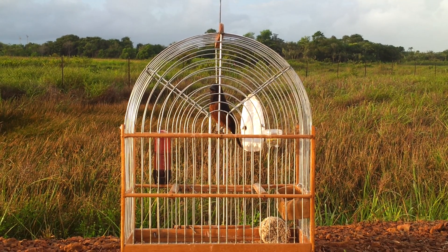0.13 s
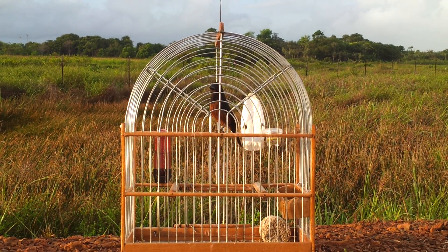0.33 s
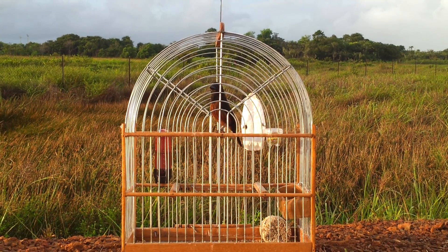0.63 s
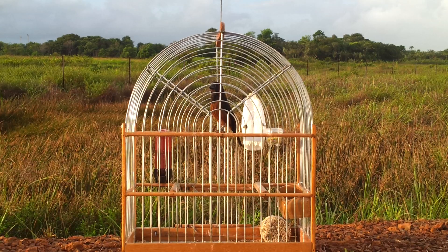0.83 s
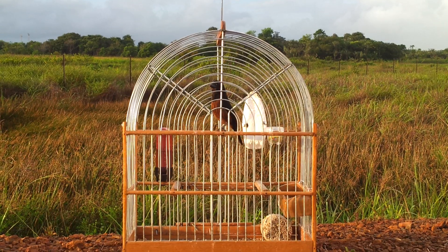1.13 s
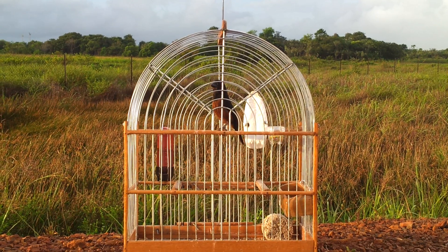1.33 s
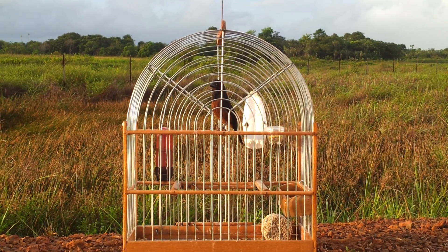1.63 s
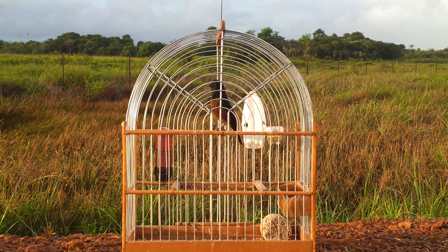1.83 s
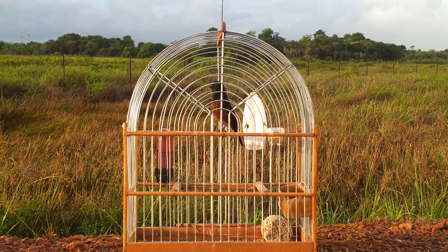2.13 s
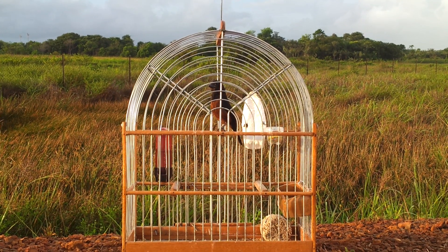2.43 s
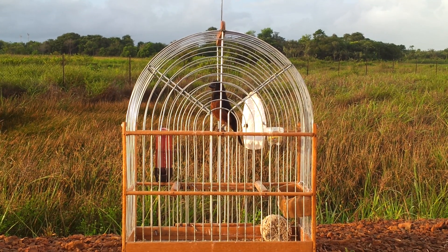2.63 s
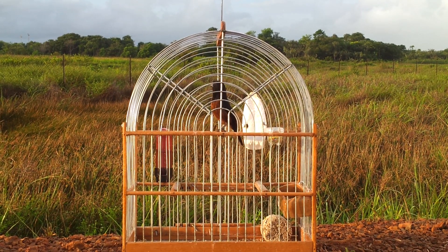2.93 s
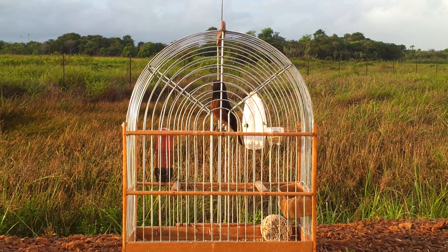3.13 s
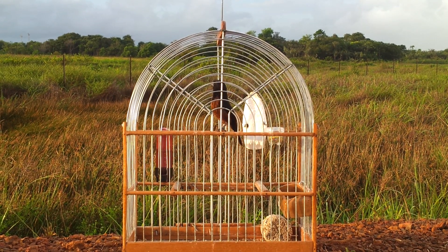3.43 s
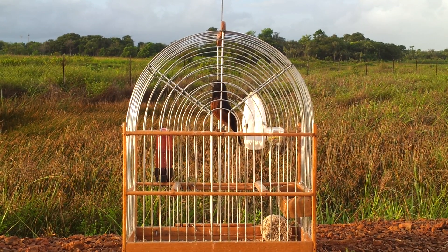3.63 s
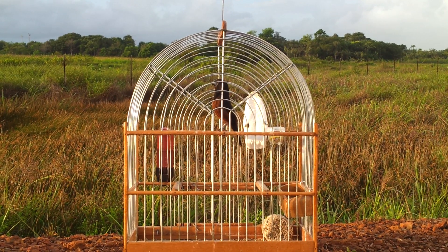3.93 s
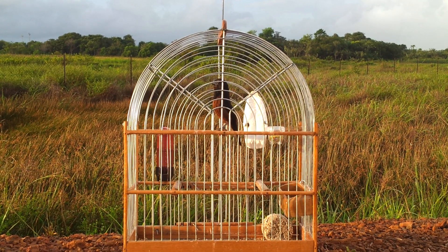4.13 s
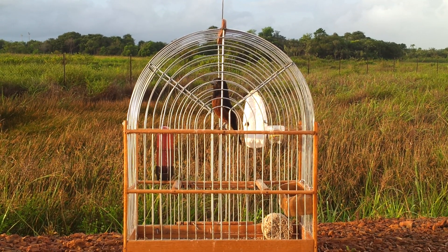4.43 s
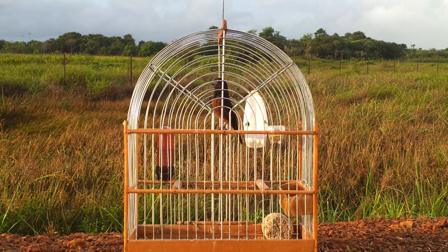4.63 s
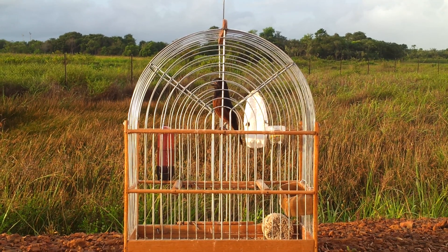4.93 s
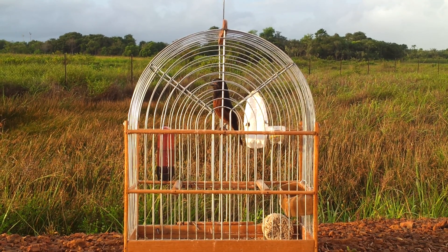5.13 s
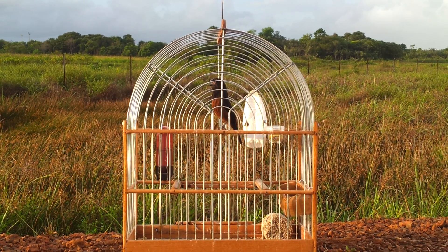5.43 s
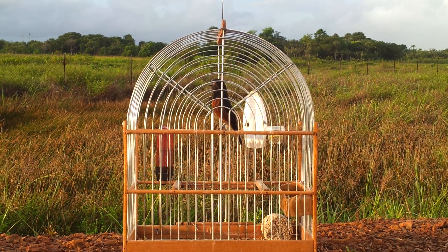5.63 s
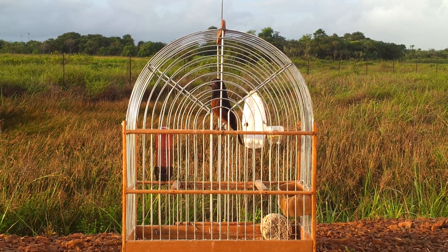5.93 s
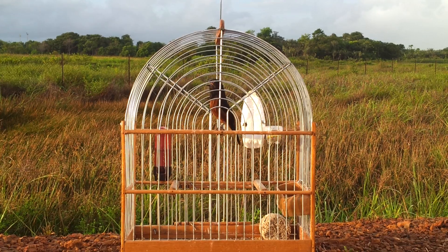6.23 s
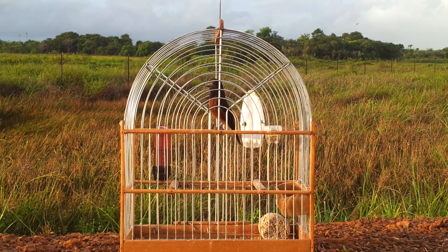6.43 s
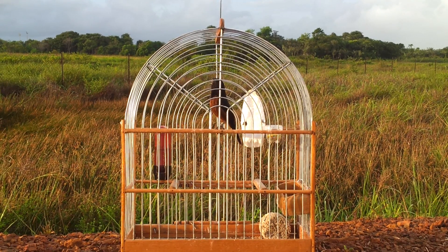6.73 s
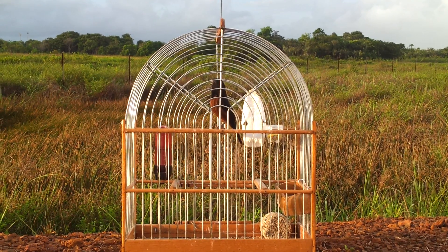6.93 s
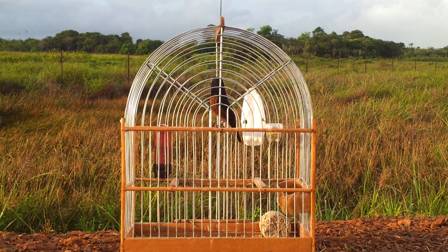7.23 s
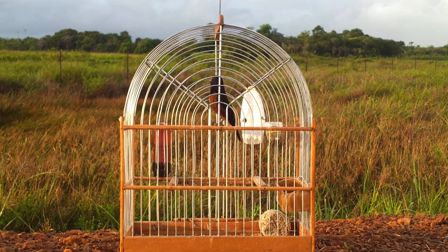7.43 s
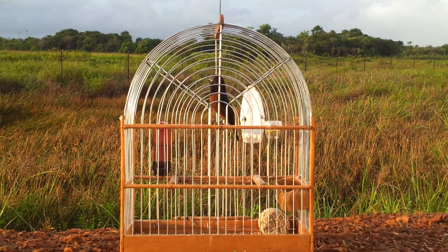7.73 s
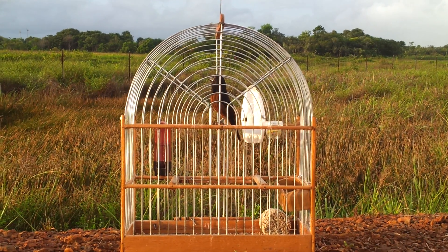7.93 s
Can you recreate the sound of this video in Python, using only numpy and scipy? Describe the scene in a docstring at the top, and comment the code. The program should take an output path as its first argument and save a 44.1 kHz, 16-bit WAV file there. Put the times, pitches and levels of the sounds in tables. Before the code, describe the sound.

Close by, a caged finch sings one long phrase in an open field. Before it starts there are only faint distant chirps, a high insect drone and a low hush of air. The song opens with soft gliding whistles, then speeds up and swells through reedy notes and quick buzzy trills, finishing on a short hooked whistle. The insects and air carry on underneath throughout.

```python
"""A steady insect chorus and the low wash of open air fill a grass field; faint far birds call first.
From 2.9 s a caged seed finch sings one accelerating, swelling phrase, its syrinx gliding through
pure slurs, then reedy notes too. From 5.7 to 6.9 s come three buzzy trills of overlapping sweeps,
the second opened by a nasal squeak. Slurs and a last hook end the phrase at 8.2 s.
Reflections off the cage tray and the ground make every glide flutter in level."""
import sys
import numpy as np
from scipy import signal
from scipy.fft import rfft, irfft, next_fast_len
from scipy.io import wavfile
from scipy.ndimage import uniform_filter1d, minimum_filter1d, map_coordinates

SR = 44100
rng = np.random.default_rng(int(sys.argv[2]) if len(sys.argv) > 2 else 0)


def int16_out(signal):
    """Quantize to a 16-bit WAV file."""
    q = np.round(np.clip(np.atleast_2d(signal).T, -1, 1) * 32767)
    wavfile.write(sys.argv[1], SR, q.astype(np.int16))


N = 356769

# Pure syllable shapes: t/s from onset, f/Hz, level/dB
DIP = [(0, 4320, -12.5), (.015, 4070, -11), (.048, 4000, -9.5), (.085, 3277, -18), (.121, 3386, -2.5),
       (.161, 3790, -0.5), (.173, 3257, -18.5), (.219, 3160, -17)]  # dips, climbs back
HOOK = [(0, 3850, -17.5), (.052, 3693, -1), (.082, 3310, -19.5), (.102, 3784, -10), (.136, 3660, -3.5),
        (.222, 3149, -6), (.234, 4140, -13), (.245, 4270, -34)]  # two falls, upward hook
STAIR = [(0, 3965, -18.5), (.018, 4080, -3), (.029, 4300, -7), (.068, 2960, -24), (.103, 3120, -4.5),
         (.153, 3143, -1), (.178, 2560, -23)]  # high step, held low step
PEAK = [(0, 4410, -18.5), (.018, 4634, -13), (.04, 5340, -22.5), (.046, 6430, -41.5), (.06, 4900, -12.5),
        (.071, 4476, -3.5), (.103, 3804, -3), (.122, 3643, -19)]  # thin peak, loud fall
# Pure syllables: shape, t/s, time stretch, pitch ratio, level/dB, crescendo/dB
PURE_SYLLABLES = [(DIP, 2.922, 0.97, 1.025, -38.5, 2.4), (DIP, 3.233, 0.97, 0.99, -30.5, -1),
                  (HOOK, 4.38, 1., 1., -15, 0), (STAIR, 4.697, 0.98, 1., -13, 1.5),
                  (STAIR, 5.02, 0.99, 0.999, -11, 0), (PEAK, 6.426, 0.98, 1., -3.5, 0),
                  (PEAK, 6.583, 0.88, 1.005, -5, 4), (HOOK, 7.99, .92, 0.99, -14.5, 2.5)]
# Slurs, one contour each: t/s, f/Hz, level/dB
SLURS = [
    [(3.539, 4020, -42.5), (3.601, 3666, -23), (3.651, 3050, -42.5), (3.667, 3730, -35.5),
     (3.687, 3857, -29), (3.699, 3854, -42), (3.711, 3790, -25), (3.747, 3140, -36), (3.752, 3110, -41)],
    [(4.016, 3820, -32.5), (4.052, 3730, -22.5), (4.09, 3574, -26.5), (4.124, 3230, -22),
     (4.162, 2760, -37.5), (4.21, 3285, -25), (4.248, 3273, -19.5), (4.282, 3140, -25.5),
     (4.298, 3270, -40)],
    [(6.972, 3850, -33), (6.992, 3737, -14.5), (7.024, 3657, -31.5), (7.036, 3150, -41.5),
     (7.072, 3080, -17), (7.08, 3124, -28), (7.108, 3454, -13), (7.128, 3666, -13), (7.136, 3800, -33)],
    [(7.189, 3700, -39), (7.199, 3635, -17), (7.223, 3581, -13), (7.243, 3347, -12), (7.267, 3140, -27.5),
     (7.285, 3028, -10.5), (7.315, 2694, -24), (7.327, 2560, -30), (7.335, 2590, -50)],
    [(7.585, 3630, -33.5), (7.627, 3760, -15.5), (7.697, 3165, -12.5), (7.721, 2754, -22.5),
     (7.743, 2646, -35.5), (7.773, 3260, -18), (7.797, 3229, -17), (7.853, 2844, -21), (7.868, 2450, -41)],
]
# Harmonics 1, 2, ...: level/dB
PURE_HARMONICS_DB = [1.5, -34, -38]


def whistles():
    """Near-sine syllables and slurs from the syrinx."""
    contours = syllable_contours(PURE_SYLLABLES) + list(SLURS)
    return syrinx(contours, PURE_HARMONICS_DB, jitter=.0025, roughness=.008, effort=.1)


# Reedy syllable shapes: t/s from onset, f/Hz, level/dB
SCOOP = [(0, 2186, -16), (.016, 1876, -3), (.038, 1680, -10.5), (.062, 2070, -3.5), (.1, 2110, -0.5),
         (.11, 1866, -5), (.119, 1300, -16)]  # scoops up, holds
SHELF = [(0, 3050, -34.5), (.033, 2257, -2.5), (.054, 2271, -2), (.073, 2365, -1.5), (.092, 1723, -13)]  # slides down, holds, drops
CROAK = [(0, 1410, -12), (.007, 1906, 1), (.018, 1870, 1.5), (.029, 1500, -16.5)]
ARCH = [(0, 1219, -19.5), (.023, 1540, -8), (.055, 1674, -15), (.106, 1928, -4), (.152, 2152, -4),
        (.189, 2417, -1.5), (.218, 2076, -2.5), (.254, 1847, -10), (.284, 1778, -13), (.301, 1450, -16)]
# Reedy syllables: shape, t/s, time stretch, pitch ratio, level/dB, crescendo/dB
REEDY_SYLLABLES = [(SCOOP, 3.851, 1, 1.008, -26.5, 1), (SHELF, 4.86, 0.97, .99, -15.5, 0),
                   (SHELF, 5.185, 1., 1.008, -12.5, 2), (CROAK, 5.343, 1., 1.014, -20, 0),
                   (ARCH, 5.372, 1., 1., -14.5, 0), (CROAK, 6.375, 1., 1.02, -25, -4),
                   (SCOOP, 7.42, 0.98, 1.008, -17, 0)]
# Harmonics 1, 2, ...: level/dB
REEDY_HARMONICS_DB = [-18, 0, -29, -30, -34]


def reedy_notes():
    """Low syllables carried by their second harmonic."""
    contours = syllable_contours(REEDY_SYLLABLES)
    return syrinx(contours, REEDY_HARMONICS_DB, jitter=.004, roughness=.02, effort=.55)


# Squeak contour: t/s, f/Hz, level/dB
SQUEAK = [(6.010, 1150, -43.5), (6.024, 1525, -27), (6.039, 1270, -38.5), (6.054, 1650, -40),
          (6.062, 1460, -36)]
# Harmonics 1, 2, ...: level/dB
SQUEAK_HARMONICS_DB = [-18.5, -15, 1, -2.5, -8.5]


def squeak():
    """A rough nasal note opens the falling trill."""
    return syrinx([SQUEAK], SQUEAK_HARMONICS_DB, jitter=.014, roughness=.28, effort=.14)


def syllable_contours(syllables):
    """Shapes placed, stretched, transposed and ramped in level."""
    contours = []
    for shape, start_s, stretch, ratio, db, crescendo_db in syllables:
        t, hz, shape_db = np.transpose(shape)
        ramp_db = crescendo_db * (t / t[-1] - .5)
        contours.append(np.c_[start_s + stretch * t, ratio * hz, db + shape_db + ramp_db])
    return contours


def syrinx(contours, harmonics_db, jitter, roughness, effort, edge_s=.00052, neutral_db=-18.5):
    """One side of the syrinx follows each contour; louder notes lean to their upper harmonics."""
    out = np.zeros(N)
    carrier = np.argmax(harmonics_db)
    for contour in contours:
        knots_s, knots_hz, knots_db = np.transpose(contour)
        t = np.arange(knots_s[0], knots_s[-1], 1 / SR)
        pitch_hz = glide(t, knots_s, knots_hz)
        level_db = np.interp(t, knots_s, knots_db)
        phase = jittered_phase(pitch_hz, jitter, drift_hz=277)
        tilt_db = effort * (level_db - neutral_db)
        tone = 0
        for k, db in enumerate(harmonics_db):
            colour = 1 if k == carrier else beak_gain((k + 1) * pitch_hz)
            tone += undb(db + tilt_db * np.sign(k - carrier)) * colour * np.sin((k + 1) * phase)
        gate = np.clip(np.minimum(t - t[0], t[-1] - t) / edge_s, 0, 1)
        flutter = 1 + roughness * drift(2600, len(t))
        add(out, t[0], gate * undb(level_db) * flutter * tone)
    return out


# Sweep trains, keyed as in sweep_train(). Pairs: first, last sweep; level/dB: first, climax, last
TRILLS = [ dict(start_s=5.742, count=7, period_s=(.018, .028), length_s=(0.023, .051), from_hz=(3390, 2740),
          to_hz=(4456, 3800), bow_hz=79.6, level_db=(-19.5, -6, -13.5), climax=.38, crest=0.66),
          dict(start_s=6.058, count=7, period_s=(.0158, .0162), length_s=(0.017, .022),
          from_hz=(4680, 4400), to_hz=(2830, 2560), bow_hz=-36, level_db=(-32.5, -22.5, -13.5),
          climax=0.52, crest=0.16), dict(start_s=6.065, count=7, period_s=(.0145, .018),
          length_s=(.015, 0.016), from_hz=(7780, 8100), to_hz=(5650, 5100),
          bow_hz=40.6, level_db=(-17, -10.5, -19), climax=.36, crest=0.44),
          dict(start_s=6.174, count=5, period_s=(.0225, 0.026), length_s=(.03, .031), from_hz=(4850, 4550),
          to_hz=(2730, 2560), bow_hz=30, level_db=(-5.5, -10, -17.5), climax=0.68, crest=0.32),
          dict(start_s=6.731, count=7, period_s=(.018, .0245), length_s=(.027, .046), from_hz=(3270, 2380),
          to_hz=(4245, 3560), bow_hz=172, level_db=(-16.5, -11.5, -19), climax=0.39, crest=0.74)]
# Lone slides, other side of the syrinx: t/s, length/s, start f/Hz, end f/Hz, bow/Hz, level/dB, crest/0-1
SLIDES = [(4.286, 0.0127, 3180, 3750, 0, -31, 0.35), (4.722, 0.05, 6210, 3560, -300, -26, 0.51),
          (5.045, 0.047, 6270, 3560, -300, -23, 0.63), (5.34, 0.013, 3300, 5000, 3, -23, .66),
          (5.738, 0.0055, 4750, 4640, -40, -26.5, .36), (5.918, 0.016, 3070, 2820, -100, -25.5, 0.43),
          (6.048, .013, 6270, 6550, 500, -16, .55), (6.399, 0.023, 2040, 2350, 1105, -22.5, 0.3),
          (6.888, 0.016, 2820, 2745, -56, -29.5, 0.6), (7.007, .021, 3740, 3490, 780, -26, .4),
          (7.701, 0.057, 3700, 4250, 6, -39, 0.7)]


def trills(coupling=.29, second_db=-28, third_db=-39, rasp_db=-35, high_rasp_db=-17,
           grit_db=-37, snap_grit_db=-27, low_cut_hz=2550):
    """Overlapping sweeps couple into sum and difference tones; high ones rasp, snaps are gritty."""
    snaps = sweeps(SLIDES, jitter=.009) + sweeps(closing_flicks(), jitter=.04)
    trains = [sweep for train in TRILLS for sweep in sweep_train(**train)]
    tone = snaps + sweeps(trains, jitter=.009)
    envelope = np.sqrt(uniform_filter1d(abs(tone) ** 2, size=180).clip(0) + 1e-12)
    phasor = tone / envelope
    voice = tone.real * (1 - coupling * (abs(phasor) ** 2 - 1))
    overtones = envelope * (undb(second_db) * phasor ** 2 + undb(third_db) * phasor ** 3).real
    overtones = irfft(rfft(overtones) * beak_gain(np.fft.rfftfreq(N, 1 / SR)), N)
    strain = uniform_filter1d(abs(highpass(tone, hz=5600)), size=500)
    rasp = stereo_noise(lambda hz: (hz / 3800) ** 3 / (1 + (hz / 4800) ** 5.1))[0]
    rasp *= undb(rasp_db) * envelope + undb(high_rasp_db) * strain
    grit = rng.standard_normal(N) * (undb(grit_db) * abs(tone) + undb(snap_grit_db) * abs(snaps))
    # Everything below the low cut is removed, so no low difference tones sound.
    return highpass(voice + overtones + grit + rasp, low_cut_hz)


def sweep_train(start_s, count, period_s, length_s, from_hz, to_hz, bow_hz, level_db, climax, crest):
    """Sweeps slow, lengthen and shift in pitch; the middle level falls at climax (0-1)."""
    starts_s = start_s + np.r_[0, np.cumsum(np.linspace(*period_s, count - 1))]
    spans = [np.linspace(*pair, count) for pair in (length_s, from_hz, to_hz)]
    levels_db = np.interp(np.linspace(0, 1, count), [0, climax, 1], level_db)
    return [(t, *span, bow_hz, db, crest) for t, *span, db in zip(starts_s, *spans, levels_db)]


def closing_flicks(lead_s=.014, length_s=.013, from_hz=6900, to_hz=3000, relative_db=-14, crest=.74):
    """Each reedy syllable snaps shut with a downward flick."""
    return [(note[-1, 0] - lead_s, length_s, from_hz, to_hz, 0, note[:, 2].max() + relative_db, crest)
            for note in syllable_contours(REEDY_SYLLABLES)]


def sweeps(rows, jitter):
    """Short bowed glides, each loudest at its crest (0-1), as one complex tone."""
    out = np.zeros(N, complex)
    for start_s, length_s, from_hz, to_hz, bow_hz, db, crest in rows:
        u = np.linspace(0, 1, int(length_s * SR))
        hz = from_hz + (to_hz - from_hz) * u + 4 * bow_hz * u * (1 - u)
        swell = np.sin(np.pi * np.interp(u, [0, crest, 1], [0, .5, 1])).clip(0) ** 1.5
        phase = jittered_phase(hz, jitter, drift_hz=1500)
        add(out, start_s, undb(db) * swell * np.exp(1j * phase))
    return out


# Throat and beak response: f/Hz, level/dB
BEAK_RESPONSE = [(2000, -3.5), (4000, 24.5), (5500, 6), (7000, 8.5), (8400, -6.5), (10000, 4.5), (11500, 9),
                 (14000, -1.5)]


def beak_gain(hz):
    """Throat and beak colour the harmonics."""
    return undb(np.interp(hz, *np.transpose(BEAK_RESPONSE)))


def throat_hiss(song, hiss_db=-35, centre_hz=4200, width_hz=800, knee=.1):
    """Air rushing through the syrinx rings the throat faintly during notes."""
    flow = np.tanh(uniform_filter1d(abs(song), size=200) / knee) * knee
    hiss = stereo_noise(lambda hz: (1 + ((hz - centre_hz) / width_hz) ** 2) ** -1.5)[0]
    return undb(hiss_db) * flow * hiss


# Tray and ground reflections, left list then right: delay/ms, signed gain
REFLECTIONS = [
    [(0.287, -0.31), (1.072, 0.06), (3.92, -0.56), (5.715, -0.33)],
    [(0.677, 0.071), (1.345, -0.44), (3.711, 0.13), (4.169, -0.32)],
]


def cage_and_field(song, left_db=.6, right_db=1.44, scatter_db=-32, t60_s=.37):
    """Direct song, near reflections and faint scatter from the grass."""
    left, right = (song + sum(gain * delayed(song, ms) for ms, gain in side) for side in REFLECTIONS)
    near = np.array([undb(left_db) * delayed(left, ms=.04), undb(right_db) * right])
    t = np.arange(int(.6 * SR)) / SR
    tail = rng.standard_normal((2, len(t))) * undb(-60 * t / t60_s)
    scatter = signal.fftconvolve(song[None], unit_rms(tail) / np.sqrt(len(t)), axes=1)[:, :N]
    return near + undb(scatter_db) * scatter


# Far chirps: t/s, length/s, start f/Hz, end f/Hz, bow/Hz, level/dB, crest/0-1
FAR_CHIRPS = [(.2, .04, 3700, 3380, 350, -58, .5), (.53, .04, 5400, 6600, 0, -57, .5),
              (.655, 0.05, 6000, 5400, 600, -53, .45), (.675, .03, 3700, 3350, 0, -57, .5),
              (.98, .035, 5100, 5130, 300, -56, .5), (1.26, .27, 5440, 5550, 1, -65, .4),
              (2.03, .22, 5500, 5500, 0, -64, .5), (2.415, .02, 5300, 4500, 0, -59, .5),
              (2.62, .07, 5600, 4800, 2, -56, .5)]
# Row of far pips, keyed as in sweep_train()
FAR_PIPS = dict(start_s=1.138, count=4, period_s=(.087, .116), length_s=(.023, .028), from_hz=(3680, 3750),
            to_hz=(3460, 3380), bow_hz=40, level_db=(-58, -56.5, -57.5), climax=.5, crest=.5)


def far_birds():
    """Faint chirps and pips from across the field."""
    return sweeps(FAR_CHIRPS + sweep_train(**FAR_PIPS), jitter=.022).real


# Choirs: f/Hz, width/Hz, level/dB, pulse rate/Hz, pulse depth/0-1, left minus right/dB
INSECT_CHOIRS = [(6415, 330, -57.5, 28.6, 0.7, 4), (6774, 180, -58, 34, 1, 5),
                 (7230, 820, -53, 52, 0, -1.5), (8160, 2100, -59, 69, 0.1, 2.5),
                 (9330, 1180, -59, 51, .2, -0.5), (5910, 1800, -62, 7.5, .3, 6.5)]


def insects(waver_db=.5):
    """Each choir rasps in its own band, pulsing with the wing strokes of its nearest members."""
    out = 0
    for centre_hz, width_hz, db, pulse_hz, depth, pan_db in INSECT_CHOIRS:
        band = stereo_noise(lambda hz: (1 + 2 * ((hz - centre_hz) / width_hz) ** 2) ** -2.)
        stroke = np.sin(jittered_phase(np.full(N, pulse_hz), jitter=.039, drift_hz=6.7))
        prominence = np.clip(.29 + .66 * drift(.83, N), 0, 1)
        pulsing = 1 + depth * stroke * prominence
        out += band * pulsing * undb(db + waver_db * drift(8.2, N)) * pan(pan_db)
    return out


# Open-air spectrum: f/Hz, relative level/dB
AIR_SPECTRUM = [(25, -26), (60, -18.5), (100, -9), (150, -2.5), (210, 0), (350, -1.5), (600, -3.5),
                (1000, -5), (1450, -9.5), (2400, -7), (3200, -11.5), (4500, -12.5), (10000, -15),
                (14500, -15.5)]


def air(level_db=-53, waver_db=-.04, pan_db=1.16, bass_hz=700, shared=.34, growth_db=4, growth_s=6.5):
    """Distant wash of the field; its bass, partly common to both sides, slowly grows."""
    knots_hz, knots_db = np.transpose(AIR_SPECTRUM)
    wash = stereo_noise(lambda hz: undb(np.interp(np.log(hz + 1), np.log(knots_hz), knots_db)))
    bass = signal.sosfilt(signal.butter(1, bass_hz, fs=SR, output="sos"), wash)
    crossfeed = shared * (bass[::-1] - bass) / 2
    growth = undb(growth_db * np.minimum(np.arange(N) / SR / growth_s, 1) ** 2)
    wash += crossfeed + bass * (growth - 1)
    return wash * undb(level_db + waver_db * drift(3.193, N)) * pan(pan_db)


def undb(db):
    """Decibels to gain."""
    return 10 ** (np.asarray(db) / 20)


def pan(db):
    """Left and right gains, db apart."""
    return undb([[db / 2], [-db / 2]])


def unit_rms(x):
    """Scale to rms 1."""
    return x / np.sqrt(np.mean(x ** 2))


def drift(rate_hz, size):
    """Smooth random curve, spread near 1."""
    at = np.arange(size) * rate_hz / SR
    return map_coordinates(rng.standard_normal(int(at[-1]) + 3), [at], order=3, mode="nearest")


def jittered_phase(hz, jitter, drift_hz):
    """Phase/rad of a frequency that wanders by the fraction jitter."""
    return 2 * np.pi * np.cumsum(hz * (1 + jitter * drift(drift_hz, len(hz)))) / SR


def stereo_noise(spectrum):
    """Two independent noises with amplitude spectrum(hz)."""
    size = next_fast_len(N, True)
    shaped = rfft(rng.standard_normal((2, size))) * spectrum(np.fft.rfftfreq(size, 1 / SR))
    return unit_rms(irfft(shaped, size)[:, :N])


def highpass(x, hz):
    """Sixth-order low cut."""
    return signal.sosfilt(signal.butter(6, hz, "high", fs=SR, output="sos"), x)


def glide(t, knots_s, values):
    """Cubic through the knots, flat at turning points."""
    step_s = np.diff(knots_s)
    slope = np.diff(values) / step_s
    before, after = slope[:-1], slope[1:]
    inner = (before * abs(after) + after * abs(before)) / (abs(before) + abs(after) + 1e-9)
    tangent = np.r_[slope[0], inner, slope[-1]]
    k = np.clip(np.searchsorted(knots_s, t) - 1, 0, len(step_s) - 1)
    u = np.clip((t - knots_s[k]) / step_s[k], 0, 1)
    bow = (tangent[k] - slope[k]) * (1 - u) - (tangent[k + 1] - slope[k]) * u
    return values[k] + step_s[k] * u * (slope[k] + (1 - u) * bow)


def delayed(x, ms):
    """Fractional delay by windowed sinc."""
    lag = ms * SR / 1000
    k = np.arange(int(lag) + 17) - 8 - lag
    kernel = np.sinc(k) * np.sinc(k / 8) * (abs(k) < 8)
    return np.convolve(x, kernel)[8:N + 8]


def add(track, start_s, sound):
    """Mix a sound into a track."""
    i = int(start_s * SR)
    part = sound[:max(N - i, 0)]
    track[i:i + len(part)] += part


def scene():
    """The finch in front, the field all around."""
    song = whistles() + reedy_notes() + squeak() + trills()
    song += throat_hiss(song)
    return cage_and_field(song) + far_birds() + insects() + air()


def record(dry, top_hz=14600):
    """Fast peak limiter at full scale, then a steep low-pass."""
    safe_gain = minimum_filter1d(1 / np.maximum(abs(dry).max(axis=0), 1), size=200)
    limited = dry * uniform_filter1d(safe_gain, size=200)
    return signal.sosfilt(signal.ellip(10, .2, 80, top_hz, fs=SR, output="sos"), limited)


dry = scene()
out = record(dry)
int16_out(out)
```